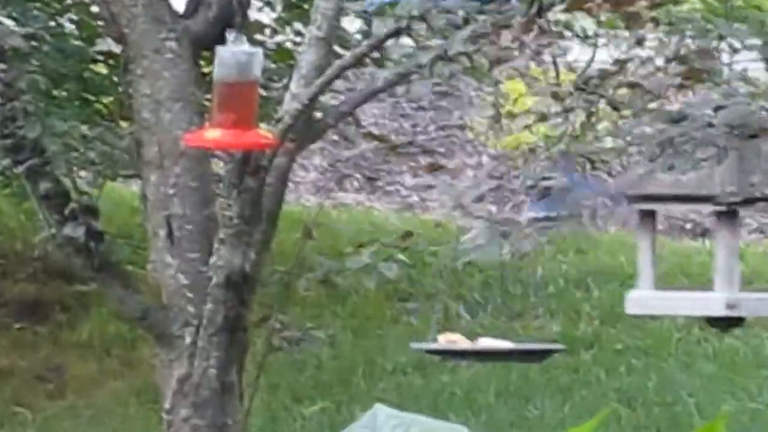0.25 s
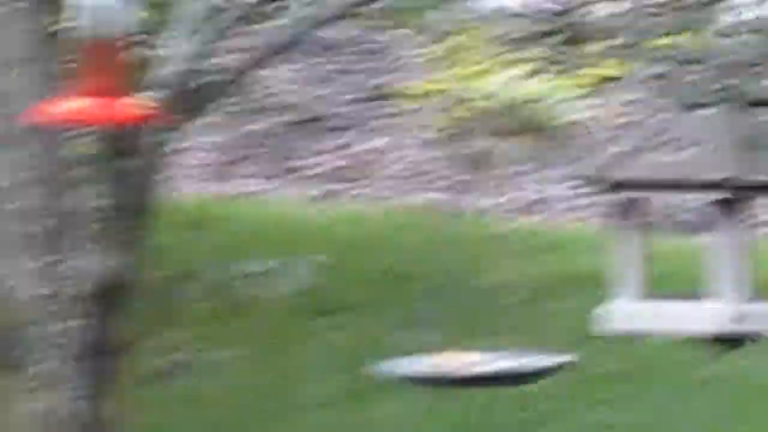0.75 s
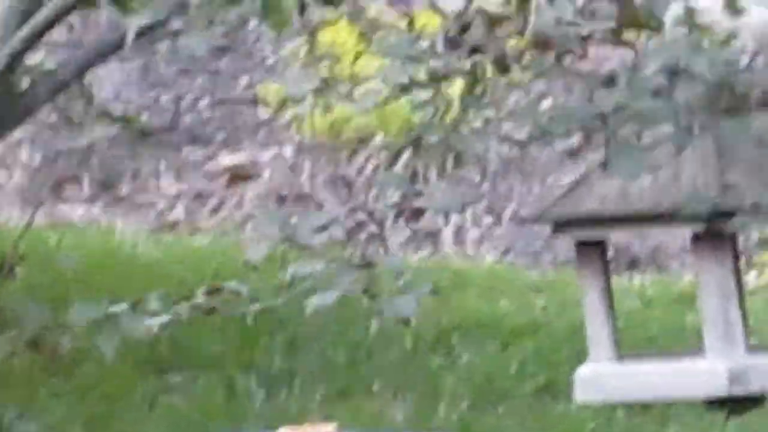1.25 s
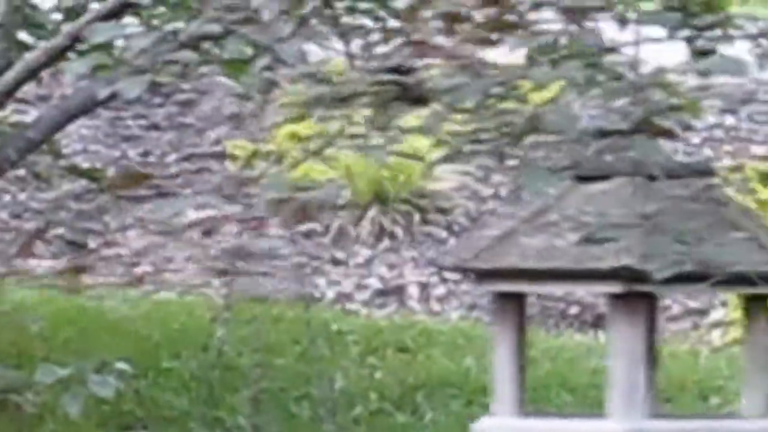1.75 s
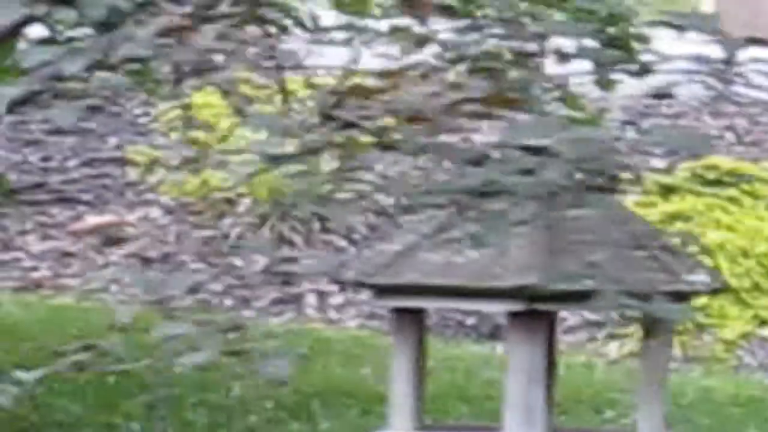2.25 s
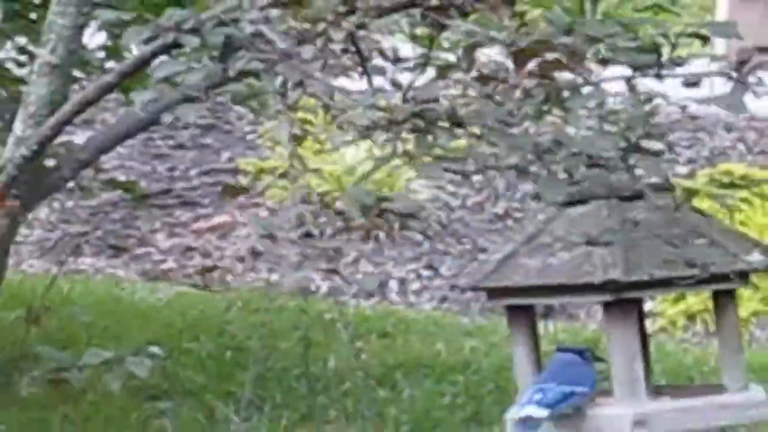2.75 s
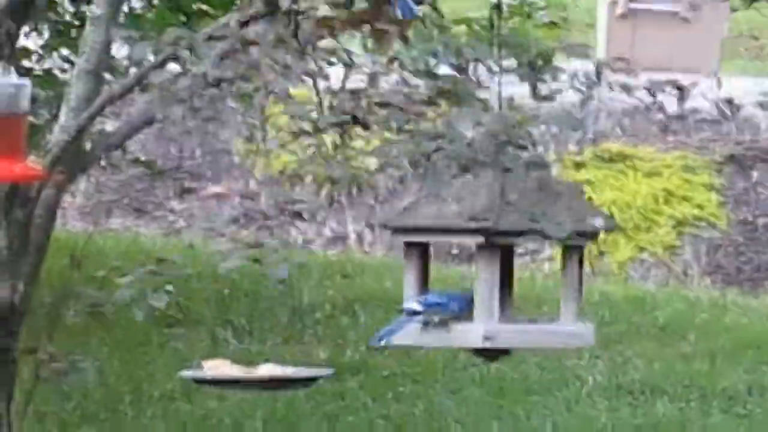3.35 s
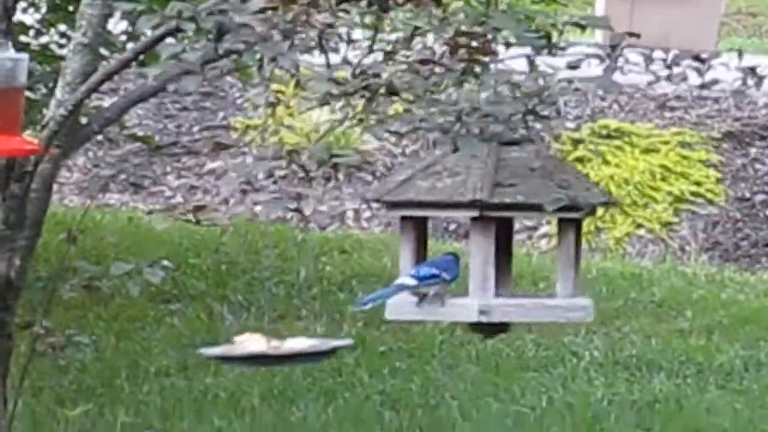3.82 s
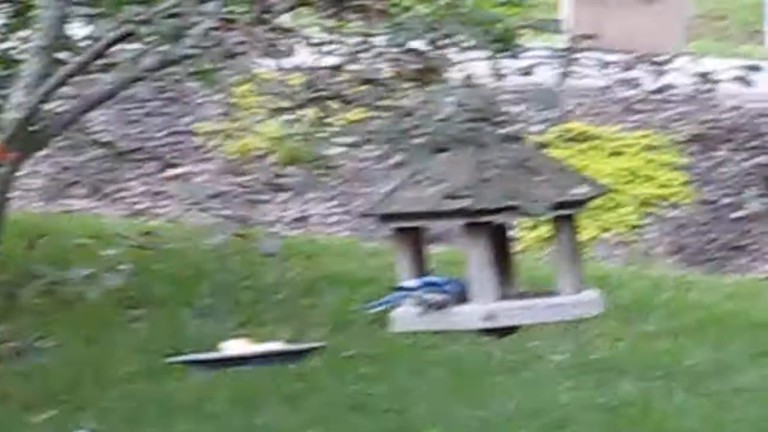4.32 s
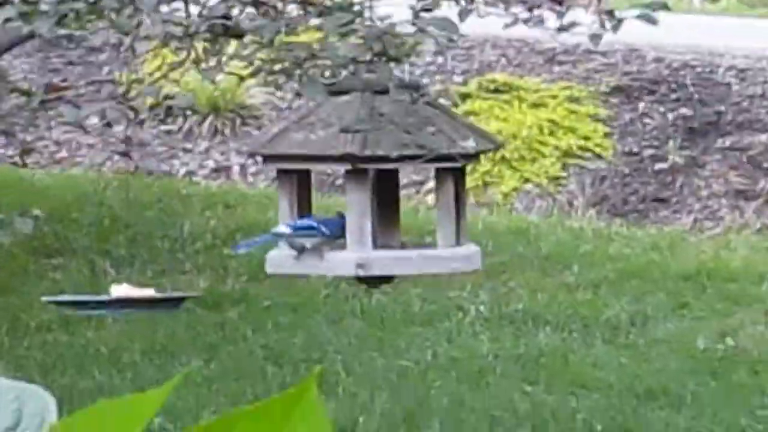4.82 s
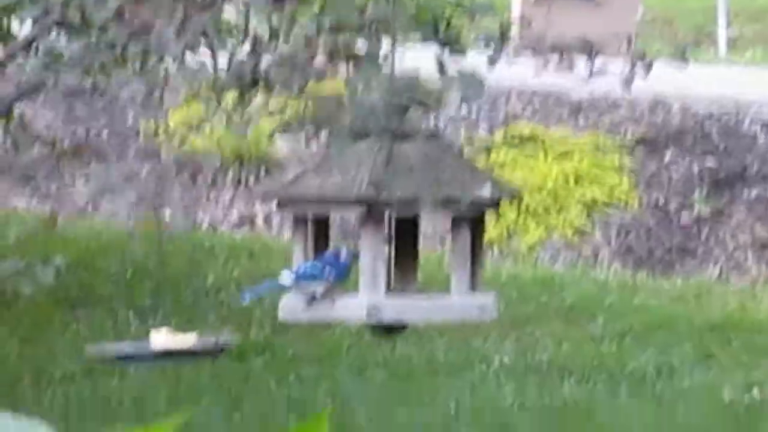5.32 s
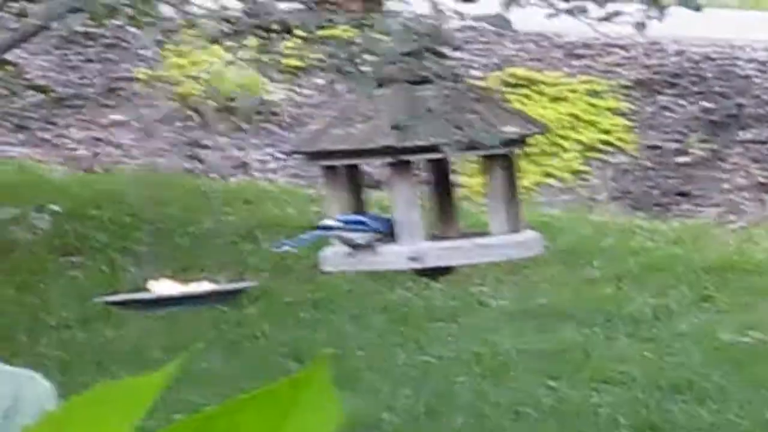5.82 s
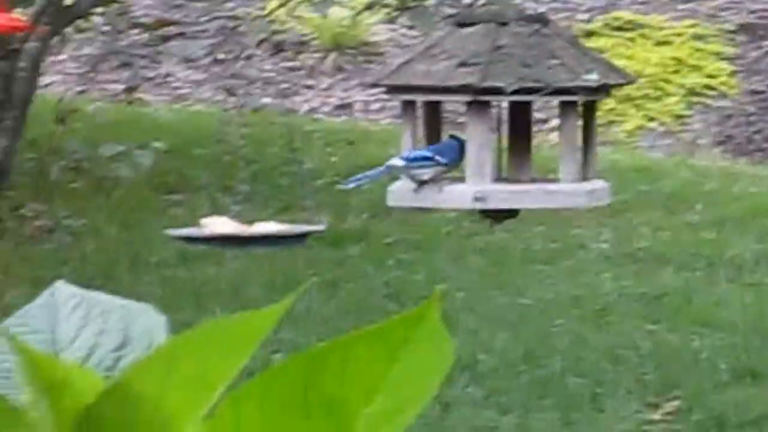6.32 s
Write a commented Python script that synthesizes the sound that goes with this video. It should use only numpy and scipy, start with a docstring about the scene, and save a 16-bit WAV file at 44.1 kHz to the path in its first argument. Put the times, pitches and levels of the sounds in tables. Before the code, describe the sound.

Harsh jay screams over a quiet garden hush, one very loud hard click, a short creak and three rising warbled whistles, then two fainter jay calls.

```python
"""Jays in a backyard

Four jay screams: harmonics of a syrinx filtered by a moving beak resonance, with noise and throbbing as roughness.
Between them a farther bird gives three rising whistles: warbling sines, heard with much diffuse scatter.
Creaks, clicks and a small rustling tick close by are band-limited impulses, some of which ring a stiff part.
Faint chips, rustles, far calls and insect trills are short noise bands, beside a thin gliding sine.
Shaped noise makes the steady outdoor hush, with a low hum beneath."""
import sys
import numpy as np
from scipy import signal
from scipy.fft import rfft, irfft
from scipy.io import wavfile

SR = 44100
rng = np.random.default_rng(int(sys.argv[2]) if len(sys.argv) > 2 else 0)


def materialize(psi):
    """Save the field psi as 16-bit PCM at rate SR to the path in sys.argv[1].

    A 1-D psi becomes a single channel; in a 2-D psi each row is a channel.
    """
    bounded = np.clip(np.atleast_2d(psi).T, -1, 1)
    quanta = np.round(bounded * 32767).astype(np.int16)
    wavfile.write(sys.argv[1], SR, quanta)


N = 289737

# Table levels are relative: each source applies its own mixing gain.
# Outdoor hush, spectral density: (f/Hz, level/dB per Hz)
HUSH_SPECTRUM = [(15, -38), (25, -8.5), (70, 0), (211, -4), (342, -6), (414, -6), (557, -6), (812, -9.5),
                 (1320, -12.5), (2730, -15), (3300, -14), (6660, -19.5), (7830, -27), (8730, -25.5),
                 (15800, -31)]
HUSH_DB = -46.1   # mean level
# Far, unsteady hum: (f/Hz, width/Hz, level/dB)
DRONE = (349, 24, -62.5)

# Clearest chips, rustles and faint far calls: (centre t/s, half length/s, f/Hz, width/Hz, level/dB)
FAINT_EVENTS = [(.535, .038, 6230, 1500, -48.5), (1.421, .12, 3300, 2000, -53),
                (1.606, .06, 3270, 700, -51), (2.029, .084, 1790, 400, -53), (2.201, .1, 3900, 900, -51),
                (2.744, .06, 5670, 1400, -51), (3.403, .056, 5430, 1400, -51),
                (4.127, .25, 3100, 1190, -55), (5.309, .032, 2070, 600, -50.5),
                (6.126, .035, 2270, 1000, -47.5), (6.182, .045, 2880, 250, -46.5),
                (6.462, .049, 2230, 1230, -41.5), (6.46, .041, 5000, 6000, -51)]
# Fainter chips at random: centre and spread of pitch, width as a share of pitch; half length and level
CHIP_HZ, CHIP_SPREAD_OCTAVES, CHIP_WIDTH_SHARE = 2900, .75, .12
CHIP_HALF_S, CHIP_DB, CHIP_SPREAD_DB = .07, -57.5, 1.5
# Soft brushes against the stiff part that the clicks set ringing: (centre t/s, half length/s, level/dB)
BRUSHES = [(.882, .009, -39), (.907, .017, -36), (1.72, .044, -52), (3.677, .038, -51), (4.56, .022, -45),
           (5.304, .05, -50)]
BRUSH_HZ, BRUSH_WIDTH_HZ = 1320, 220
# A faint note in two resonances of the whistler before its first call: (f/Hz)
PRELUDE_HZ = [2780, 3830]
PRELUDE_S, PRELUDE_HALF_S, PRELUDE_WIDTH_HZ, PRELUDE_DB = 2.32, .1, 130, -54
# Thin note of a small far bird: (t/s, f/Hz, level/dB)
THIN_NOTE = [(5.74, 5780, -70), (5.8, 5610, -59), (5.88, 5550, -58), (5.94, 5500, -66)]
# Bouts of insect trill: (start t/s, length/s, period/s, f/Hz)
TRILLS = [(.18, 1.85, .28, 8850), (5.86, .8, .34, 8200)]

# Single ticks of the creak, after its even run of slips: (t/s, level/dB)
CREAK_TICKS = [(2.2279, -23.5), (2.2790, -20.5), (2.3631, -16), (2.3974, -18), (2.4178, -22.5),
               (2.4326, -18), (2.546, -17.5)]
RUN_START_S, RUN_GAP_S, RUN_DB, RUN_GROWTH_DB = 2.1595, .0103, -31, 1.3   # the even run; growth per slip
# Clicks, hard and faint, and one small rustling tick (4.626 s):
# (t/s, crack level/dB, crack top f/Hz, ring level/dB, thump level/dB)
CLICKS = [(.9004, 8.5, 4500, 6, 7), (2.69, -27, 14000, -33, -60), (3.3254, -12.3, 4000, -10.3, -57),
          (4.626, -30, 7000, -59, -65)]
RING_HZ, RING_DROP_HZ = 1570, 290   # the stiff part rings lower under a full-scale blow
# The first, hardest click is led by slips that come ever faster, louder and brighter
SLIP_LEAD_S, SLIP_LEAD_RATIO = .0007, 1.55   # the last slip's lead; each earlier one leads by this factor more
SLIP_DB, SLIP_GROWTH_DB_PER_S, SLIP_RING_DB = 2.5, 3200, -7   # ring level is relative to the crack
SLIP_TOP_HZ, SLIP_BRIGHT_HZ, SLIP_BRIGHT_S = 4200, 9000, .0014

# Rising whistles: (start t/s, level/dB, lift of the warble f/Hz at unit depth)
WHISTLES = [(2.352, -37.3, 0), (2.737, -36.5, 100), (3.12, -37.5, 0)]
# Resonances of the whistler's throat: (f/Hz, width/Hz, level/dB)
WHISTLER_THROAT = [(2670, 410, 0), (3870, 86, 0)]
WHISTLE_S, WHISTLE_HZ, CLIMB_HZ_PER_S, CLIMB_S = .4, 1870, 3250, .17   # length, first pitch, climb
BREAK_AT_S, BREAK_S, BREAK_JUMP_HZ = .13, .009, 560   # the break: when, time scale, how far up
CLEAR_WARBLE, FULL_WARBLE = .14, 1.0   # warble depth before and after the break
STEP_AT_S, STEP_HZ, STEP_WARBLE = .225, 640, .35   # a second step up, and the depth it adds
CLEAR_DB, WARBLE_DB, FADE_AT_S, WHISTLE_FADE_DB_PER_S = -10.5, -2.6, .265, 65

# Jay screams: (start t/s, full voice t/s, end t/s, rise time scale/s, top f/Hz, final pitch drop share,
# level/dB, swell/dB per s, final hoarseness 0-1, release/dB per s)
SCREAMS = [(0, -.04, .095, .005, 826, .05, -19.7, -78, .85, 400),
           (.7, .87, 1.128, .02, 834, .066, -30.1, 21, .72, 420),
           (4.72, 4.733, 5.025, .012, 795, .022, -39.2, 11, .4, 140),
           (5.335, 5.347, 5.665, .012, 766, .028, -38, -6, .33, 400)]
# Beak resonance, one curve for each scream: (t/s, f/Hz)
BEAK = [
    [(.02, 3250), (.06, 4380)],
    [(.85, 3800), (.95, 5200), (1.0, 5450), (1.04, 3500), (1.075, 5200), (1.14, 4450)],
    [(4.78, 4700), (4.79, 2600), (4.87, 2700), (4.89, 3880), (5.0, 3650), (5.05, 3100)],
    [(5.36, 3060), (5.39, 4480), (5.48, 3850), (5.52, 4200), (5.59, 3100), (5.665, 3500)],
]
# Throat filter on the harmonics: (harmonic, level/dB in screams 1, 2, 3, 4)
THROAT = [(2, -10, -9.5, -4, -4), (3, -7, -6.5, -3.5, -1.5), (4, 4.5, 2, 0, 3), (5, -8, -7.5, -4, -10.5),
          (6, -2, -0.5, -0.5, 1), (7, -17, -1.5, -12, -12), (8, -7, -6.5, -5.5, -5),
          (9, -13, -14, -14, -13), (10, -24, -21, -16, -11), (11, -16, -20, -19, -16),
          (12, -20, -16.5, -19, -21), (13, -19, -19.5, -19, -14.5), (14, -20, -25, -22, -13),
          (15, -25, -28, -29, -22), (16, -26, -29, -25, -22)]
# Spectrum of the air rasping through: (f/Hz, level/dB)
RASP = [(1300, -48), (2200, -24), (2900, 4), (3700, -2), (4500, 6.5), (5800, -2.5), (7200, -6.5),
        (8500, -20), (10000, -21.5), (15500, -24)]
# The other side of the syrinx sings its own note: (t/s, f/Hz, level/dB, roughness 0-1, beak resonance f/Hz)
SECOND_VOICE = [(4.76, 965, -53, .9, 3000), (4.8, 963, -45, .9, 3700), (4.87, 945, -44.5, .4, 2550),
                (5.0, 925, -45, .8, 2750)]
# Harmonics of that second note: (harmonic, level/dB)
SECOND_THROAT = [(2, -6.5), (3, -2.5), (4, 1.5)]
SCOOP, SAG_PER_S, DROP_S = .105, .055, .047   # pitch share lost at no effort, share lost per second; drop time scale
SOFT_DB, ATTACK_DB, ATTACK_S = -10.8, -18, .007   # level offsets at no effort and at the very start; attack time
RELEASE_S = .06   # how long a scream lasts beyond its end time
CLEAR_ROUGH, SOFT_ROUGH, HOARSE_S = .07, .55, .115   # roughness in full voice, added at no effort; hoarsening time

MIC_NOTCH_HZ, MIC_NOTCH_WIDTH_HZ = 7825, 940
CUTOFF_HZ = 15900


def from_db(db):
    """Logarithmic level: decibels to amplitude gain."""
    return 10 ** (np.asarray(db) / 20)


def rms_one(x):
    """Normalisation: divide by the effective value, giving rms 1."""
    return x / np.sqrt(np.mean(x ** 2) + 1e-20)


def in_time(rows, t):
    """Linear interpolation: each column of a curve, read at the times t."""
    s, *columns = np.transpose(rows)
    return [np.interp(t, s, column) for column in columns]


def rise(t, time_s):
    """Logistic transition: a smooth step from 0 to 1 round t = 0."""
    return .5 + .5 * np.tanh(t / (2 * time_s))


def band(x, low_hz, high_hz, order=2):
    """Resonance as a causal Butterworth band-pass."""
    edges = np.clip([low_hz, high_hz], [15, 30], [.44 * SR, .45 * SR])
    sos = signal.butter(order, edges, "band", fs=SR, output="sos")
    return signal.sosfilt(sos, x + 1e-18)


def flutter(rate_hz, size):
    """Random modulation: low-passed noise with rms 1."""
    sos = signal.butter(2, rate_hz, fs=SR, output="sos")
    noise = rng.standard_normal(size + SR // 2)   # the spare half second lets the filter settle
    return rms_one(signal.sosfilt(sos, noise)[-size:])


def coloured(spectrum, size):
    """Spectral shaping: white noise weighted in frequency, rms 1."""
    hz, db = np.transpose(spectrum)
    log_hz = np.log(np.fft.rfftfreq(size, 1 / SR) + 1)
    gain = from_db(np.interp(log_hz, np.log(hz), db))
    return rms_one(irfft(rfft(rng.standard_normal(size)) * gain, size))


def add(out, start, sound):
    """Superposition: mix a sound in at a given time."""
    i = max(round(start * SR), 0)
    out[i:i + len(sound)] += sound[:max(N - i, 0)]


def span(curve):
    """Gating: the sample times of a curve, and a window with 4 ms ramps at both ends."""
    t = np.arange(curve[0][0], curve[-1][0], 1 / SR)
    return t, np.clip(np.minimum(t - t[0], t[-1] - t) / .004, 0, 1)


def garden(x, t60, build_s):
    """Diffuse scattering from trunks, leaves and walls: it builds up, then decays; unit energy."""
    t = np.arange(SR) / SR
    scatter = rng.standard_normal(SR) * from_db(-60 * t / t60) * (1 - np.exp(-t / build_s))
    return signal.fftconvolve(x, scatter / np.linalg.norm(scatter))[:N]


def hush(restless_db=1.0):
    """Broadband noise of distant air and leaves, its level wavering, with a faint narrow-band hum."""
    hz, width_hz, level_db = DRONE
    hum = rms_one(band(rng.standard_normal(N), hz - width_hz / 2, hz + width_hz / 2))
    air = from_db(HUSH_DB + restless_db * flutter(14, N)) * coloured(HUSH_SPECTRUM, N)
    return air + from_db(level_db) * hum


def puff(centre_s, half_s, hz, width_hz, level_db):
    """Narrow-band noise burst: a short swell round one pitch, placed in the scene."""
    size = int(2 * half_s * SR)
    noise = rng.standard_normal(size + SR // 20)
    grain = rms_one(band(noise, hz - width_hz / 2, hz + width_hz / 2)[-size:])
    out = np.zeros(N)
    add(out, centre_s - half_s, grain * np.hanning(size) * from_db(level_db))
    return out


def random_chips(count=22):
    """Jittered random process: faint chips scattered over the whole time, columns as FAINT_EVENTS."""
    when, pitch, strength = rng.uniform(-1, 1, (count, 3)).T
    hz = CHIP_HZ * 2 ** (CHIP_SPREAD_OCTAVES * pitch)
    times = (np.arange(count) + .5 + .5 * when) / count * N / SR
    db = CHIP_DB + CHIP_SPREAD_DB * strength
    return [(s, CHIP_HALF_S, f, CHIP_WIDTH_SHARE * f, level) for s, f, level in zip(times, hz, db)]


def thin_note():
    """Frequency modulation: a pure tone whose phase integrates a gliding pitch."""
    t, window = span(THIN_NOTE)
    pitch, level_db = in_time(THIN_NOTE, t)
    out = np.zeros(N)
    add(out, t[0], np.sin(2 * np.pi * np.cumsum(pitch) / SR) * window * from_db(level_db))
    return out


def insects(level_db=-61):
    """Periodic pulsing: evenly repeated noise bursts form each trill."""
    return sum(puff(s, 0.053, hz, 260, level_db)
               for start, length, period, hz in TRILLS
               for s in np.arange(start, start + length, period))


def small_life():
    """Superposed weak sources: chips, rustles, calls, brushes and thin notes scatter briefly; insects do not."""
    quiet = sum(puff(*row) for row in list(FAINT_EVENTS) + random_chips())
    quiet += sum(puff(s, half_s, BRUSH_HZ, BRUSH_WIDTH_HZ, db) for s, half_s, db in BRUSHES)
    quiet += sum(puff(PRELUDE_S, PRELUDE_HALF_S, hz, PRELUDE_WIDTH_HZ, PRELUDE_DB) for hz in PRELUDE_HZ)
    quiet += thin_note()
    scatter = garden(quiet, t60=0.21, build_s=0.0039)
    return from_db(1.5) * quiet + from_db(-9) * scatter + insects()


def crack(low_hz, top_hz, order):
    """Impulse response of a band-pass, scaled to a peak of 1."""
    snap = band(signal.unit_impulse(SR // 20), low_hz, top_hz, order)
    return snap / np.abs(snap).max()


def creak_run(count=5):
    """Regular stick-slip: evenly spaced slips, each stronger than the last, as creak rows."""
    return [(RUN_START_S + k * RUN_GAP_S, RUN_DB + k * RUN_GROWTH_DB) for k in range(count)]


def run_up(s, count=6, thump_db=-28):
    """Accelerating stick-slip: the slips before a hard click at time s, columns as CLICKS."""
    lead = SLIP_LEAD_S * SLIP_LEAD_RATIO ** np.arange(count)
    db = SLIP_DB - SLIP_GROWTH_DB_PER_S * lead
    top_hz = SLIP_TOP_HZ + SLIP_BRIGHT_HZ * np.exp(-(lead / SLIP_BRIGHT_S) ** 2)
    return list(zip(s - lead, db, top_hz, db + SLIP_RING_DB, db + thump_db))


def clicks(ring_width_hz=260, edge_db=-25, tick_top_hz=4100):
    """Impulsive excitation: dry stick-slip ticks, then clicks and a rustling tick with ring and thump."""
    out = np.zeros(N)
    slip = crack(950, tick_top_hz, order=1)
    low_pass = signal.cheby1(5, 1, tick_top_hz, fs=SR, output="sos")
    tick = signal.sosfilt(low_pass, slip) + from_db(-25) * slip
    tick /= np.abs(tick).max()
    for s, db in creak_run() + list(CREAK_TICKS):
        add(out, s, from_db(db) * tick)
    for s, crack_db, top_hz, ring_db, thump_db in run_up(CLICKS[0][0]) + list(CLICKS):
        ring_hz = RING_HZ - RING_DROP_HZ * min(from_db(ring_db), 1)
        snap = crack(1605, top_hz, order=3) + from_db(edge_db) * crack(1000, 8100, order=1)
        ring = crack(ring_hz - ring_width_hz / 2, ring_hz + ring_width_hz / 2, order=1)
        thump = crack(110, 1200, order=1)
        add(out, s, from_db(crack_db) * snap + from_db(ring_db) * ring + from_db(thump_db) * thump)
    return out


def whistle_curve():
    """Register break: a climb, a louder warble, a step up, a fade: (t/s from start, f/Hz, level/dB, depth)."""
    t = np.arange(0, WHISTLE_S, 1 / SR)
    broken, stepped = rise(t - BREAK_AT_S, BREAK_S), rise(t - STEP_AT_S, BREAK_S)
    climb = CLIMB_HZ_PER_S * np.minimum(t, CLIMB_S)
    pitch = WHISTLE_HZ + climb + BREAK_JUMP_HZ * broken + STEP_HZ * stepped
    fade_db = WHISTLE_FADE_DB_PER_S * np.maximum(t - FADE_AT_S, 0)
    db = CLEAR_DB + (WARBLE_DB - CLEAR_DB) * broken - fade_db
    warble = CLEAR_WARBLE + (FULL_WARBLE - CLEAR_WARBLE) * broken + STEP_WARBLE * stepped
    return np.column_stack([t, pitch, db, warble])


def whistler(spread_hz=400, top_hz=4700):
    """Random frequency modulation: a rising tone breaks into a fast rough warble, with strong scatter."""
    note = np.zeros(N)
    sweep = whistle_curve()
    t, window = span(sweep)
    pitch, shape_db, warble = in_time(sweep, t)
    for start, level_db, lift_hz in WHISTLES:
        deviation_hz = warble * (lift_hz + spread_hz * flutter(355.4, len(t)))
        phase = 2 * np.pi * np.cumsum(pitch + deviation_hz) / SR
        add(note, start, np.sin(phase) * window * from_db(shape_db + level_db) * np.sqrt(2))
    note += sum(from_db(db) * band(note, hz - width / 2, hz + width / 2, order=1)
                for hz, width, db in WHISTLER_THROAT)
    note = band(note, 1280, top_hz, order=12)
    return from_db(-6.0) * note + from_db(-3.5) * garden(note, t60=1.33, build_s=0.0032)


def scream_curve(beak, start, full, end, rise_s, top_hz, drop, level_db, swell_db_per_s, hoarse,
                 release_db_per_s):
    """Vocal effort lifts pitch and level; pitch drops and voice hoarsens at the end: columns as SECOND_VOICE."""
    t = np.arange(start, end + RELEASE_S, 1 / SR)
    age = t - full
    slack = 1 - rise(age, rise_s)   # 1 at no effort, 0 in full voice
    sinking = 2 * rise(t - end, DROP_S * np.log(2))   # passes 1 at the end time
    pitch = top_hz * (1 - SCOOP * slack - SAG_PER_S * np.maximum(age, 0) - drop * sinking)
    db = level_db + swell_db_per_s * age + SOFT_DB * slack ** 2
    db += ATTACK_DB * np.exp(-(t - min(start, full)) / ATTACK_S)
    db -= release_db_per_s * np.maximum(t - end, 0)
    rough = CLEAR_ROUGH + SOFT_ROUGH * slack + hoarse * np.exp(-np.maximum(end - t, 0) / HOARSE_S)
    return np.column_stack([t, pitch, db, rough, *in_time(beak, t)])


def scream(curve, throat, gain_db, rasp_db, jitter=0.22, shimmer=0.12, scatter=0.64, waver=0.0027,
           beak_db=8.0, beak_width_hz=650, throb_hz=135, throb=0.35, sway_db=2.5):
    """Source and filter: a syrinx buzz through a beak resonance; roughness adds throb, jitter and airy rasp."""
    t, window = span(curve)
    size = len(t)
    pitch, level_db, rough, beak_hz = in_time(curve, t)
    rough = np.clip(rough, 0, 1)
    wavering_hz = pitch * (1 + waver * (1 + 3 * rough) * flutter(68, size))
    phase = 2 * np.pi * np.cumsum(wavering_hz) / SR
    phase += jitter * rough * flutter(176, size)
    buzz, power = 0, 0
    for k, db in throat:
        harmonic = round(k)
        boost_db = beak_db * np.exp(-((harmonic * pitch - beak_hz) / beak_width_hz) ** 2)
        # the partials trade strength as the throat moves
        gain = from_db(db + boost_db + sway_db * flutter(23, size))
        # complex noise disturbs both amplitude and phase
        unsteady = 1 + scatter * rough * (flutter(155, size) + 1j * flutter(100, size))
        partial = np.exp(1j * (harmonic * phase + rng.uniform(0, 2 * np.pi)))
        buzz += gain * np.real(unsteady * partial)
        power += gain ** 2 / 2
    # the air pulses once per cycle
    air = from_db(rasp_db) * rough * coloured(RASP, size) * (1 + 0.67 * np.cos(phase))
    beat = np.sin(2 * np.pi * np.cumsum(throb_hz * (1 + 0.208 * flutter(35, size))) / SR)
    modulation = 1 + rough * (shimmer * flutter(200, size) + throb * rough * beat)
    voice = (buzz / np.sqrt(power) + air) * modulation
    out = np.zeros(N)
    add(out, t[0], voice / np.sqrt(1 + rough ** 2) * window * from_db(level_db + gain_db))
    return out


def jays(near_wet_db=-13, far_wet_db=-14):
    """Direct and scattered sound: two near, harsh screams and two farther, clearer ones, one two-voiced."""
    first, second, third, fourth = [[(row[0], row[k]) for row in THROAT] for k in range(1, len(THROAT[0]))]
    curves = [scream_curve(beak, *row) for beak, row in zip(BEAK, SCREAMS)]
    near = scream(curves[0], first, gain_db=1.0, rasp_db=-2.5)
    near += scream(curves[1], second, gain_db=-0.5, rasp_db=-2.5)
    far = scream(curves[2], third, gain_db=0.0, rasp_db=-5)
    far += scream(curves[3], fourth, gain_db=-1.0, rasp_db=1.5)
    far += scream(SECOND_VOICE, SECOND_THROAT, gain_db=0.0, rasp_db=-10, jitter=0.6, waver=0.0044)
    near_scatter = from_db(near_wet_db) * garden(near, t60=0.5, build_s=0.0059)
    far_scatter = from_db(far_wet_db) * garden(far, t60=0.56, build_s=.01)
    return near + far + near_scatter + far_scatter


def scene():
    """Linear superposition of all the sources at one microphone."""
    return (hush() + small_life() + clicks() + whistler() + jays())[None]


def gain_control(x, threshold_db=-6, share=.45, release_db_per_s=130, attack_s=.006):
    """Dynamic compression: a peak over the threshold turns the gain down; it soon recovers."""
    over_db = share * np.maximum(20 * np.log10(np.abs(x) + 1e-9) - threshold_db, 0)
    # a running maximum on a slope holds each peak and releases it at a constant rate
    slope_db = release_db_per_s * np.arange(N) / SR
    held_db = np.maximum.accumulate(over_db + slope_db, axis=-1) - slope_db
    r = np.exp(-1 / (attack_s * SR))
    return x * from_db(-signal.lfilter([1 - r], [1, -r], held_db))


def record(dry):
    """Compression, saturation and filtering: the recorder ducks, rounds peaks, notches and cuts the treble."""
    rounded = .95 * np.tanh(gain_control(dry) / .95)
    notch = signal.iirnotch(MIC_NOTCH_HZ, MIC_NOTCH_HZ / MIC_NOTCH_WIDTH_HZ, fs=SR)
    notched = signal.lfilter(*notch, rounded)
    return signal.sosfilt(signal.ellip(14, .1, 110, CUTOFF_HZ, fs=SR, output="sos"), notched)


dry = scene()
out = record(dry)
materialize(out)
```